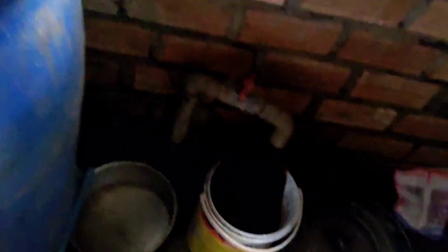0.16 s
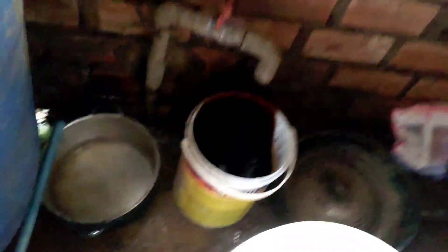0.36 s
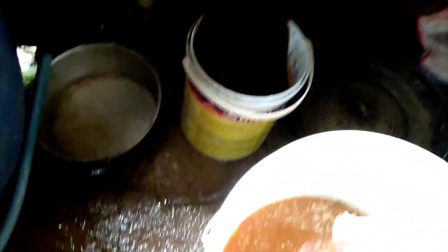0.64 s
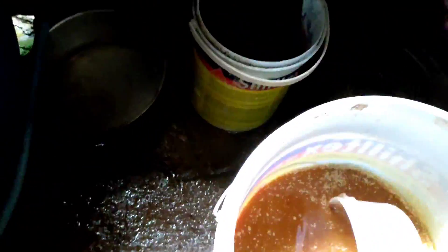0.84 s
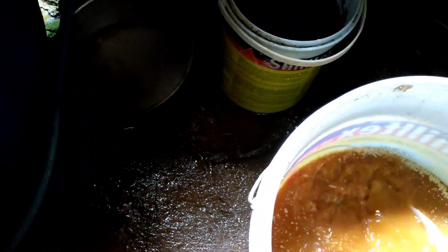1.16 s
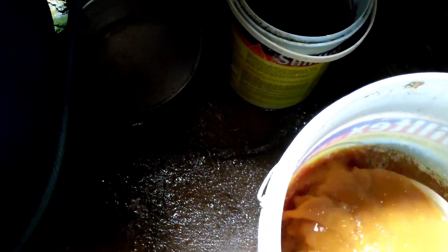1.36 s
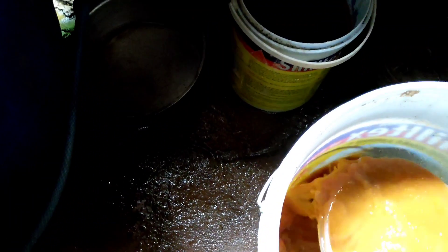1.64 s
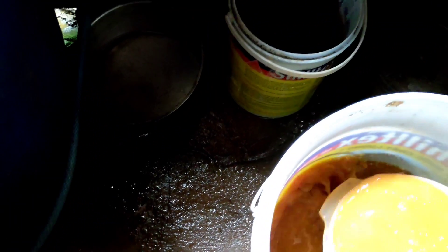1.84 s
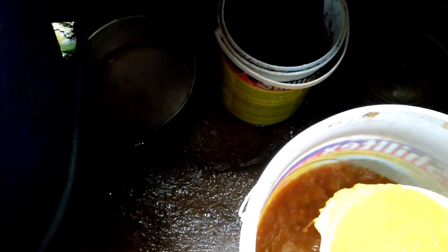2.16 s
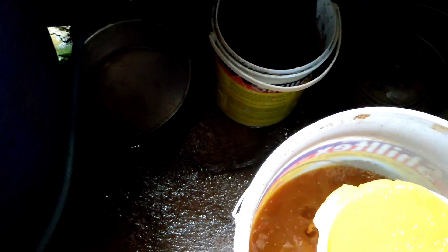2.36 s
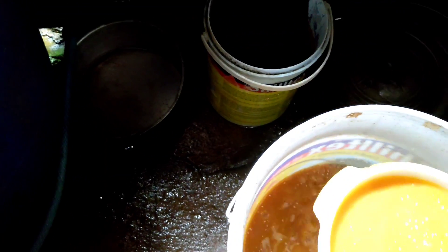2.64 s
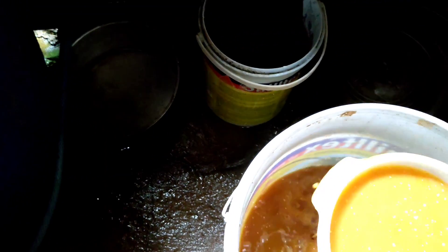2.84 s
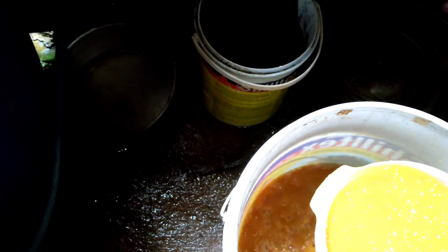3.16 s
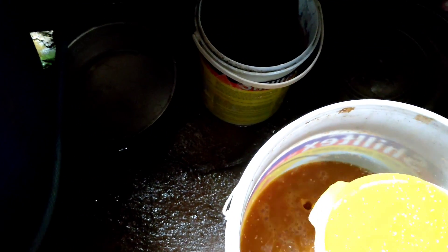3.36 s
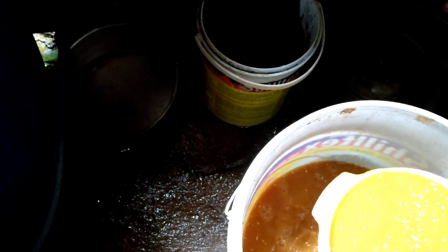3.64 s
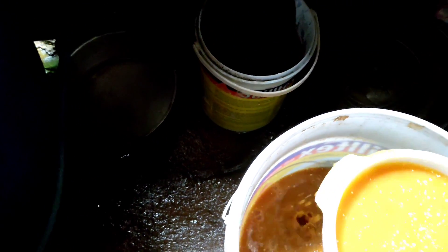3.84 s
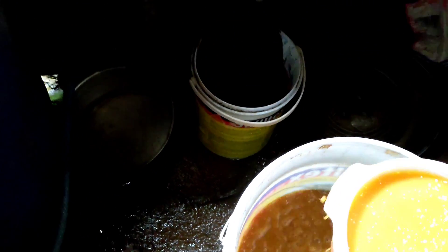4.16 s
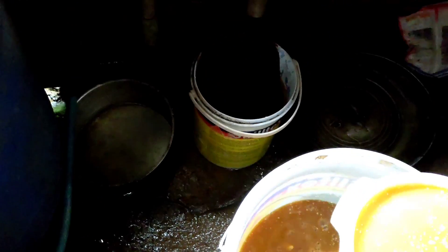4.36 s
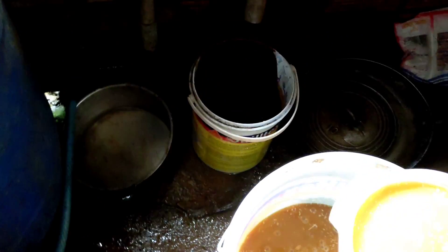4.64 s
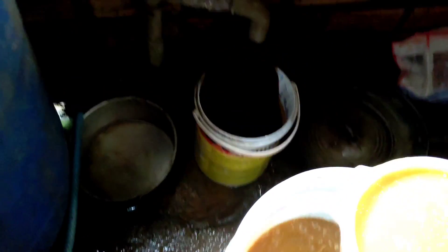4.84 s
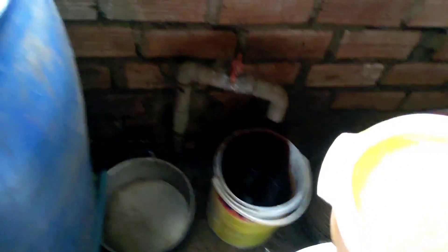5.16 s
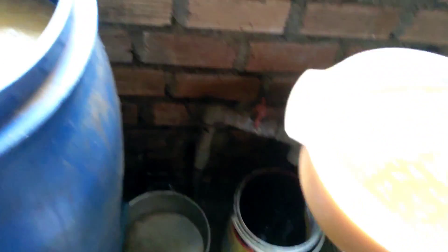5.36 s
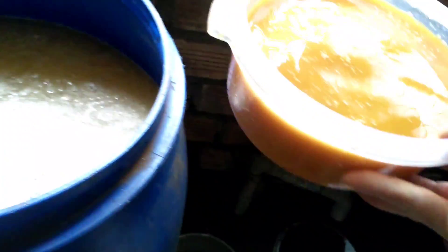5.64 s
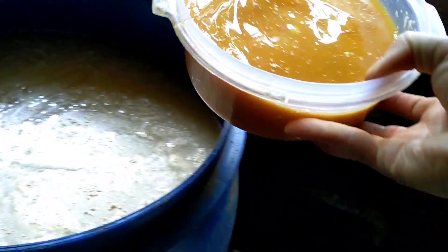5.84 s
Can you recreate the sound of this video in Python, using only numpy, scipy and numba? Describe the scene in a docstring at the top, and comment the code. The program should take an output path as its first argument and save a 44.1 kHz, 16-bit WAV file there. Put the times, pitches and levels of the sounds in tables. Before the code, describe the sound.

Close to a hand-held phone in a brick yard, a plastic scoop clacks on a bucket and gulps under. Bubbling grows into dense splashing and spatter, strongest around the middle, then drops off to a few plips. Another brief pour splashes back and thins out into isolated drops. Soft rustling and a muffled handling thump follow, over steady low rumble and short reflections.

```python
"""Thick liquid is scooped from a plastic bucket in a brick yard, close below a hand-held phone.
It runs off the scoop in streams: showers of gliding sines bubble, noise spatters and the bucket booms.
Splashes are noise slaps with clustered notes; larger bubbles ring, whistle and excite the bucket.
The scoop knocks on damped plastic modes and gulps low, sliding notes as it goes under.
Last drops plop into the quiet, over shaped-noise yard rumble, holder's rustle and a soft thump."""
import sys
import numpy as np
from scipy import signal
from scipy.fft import rfft, irfft
from scipy.io import wavfile
from scipy.ndimage import uniform_filter1d
from numba import njit

SR = 44100
rng = np.random.default_rng(int(sys.argv[2]) if len(sys.argv) > 2 else 0)


def put_to_file(sound):
    """Save the sound as 16-bit audio at rate SR, in the file named by the first command-line argument."""
    columns = np.atleast_2d(sound).T  # one column per channel
    safe = np.clip(columns, -1, 1)
    whole_steps = np.round(safe * 32767)
    wavfile.write(sys.argv[1], SR, whole_steps.astype(np.int16))


N = 264361  # samples, about 6 s

# air and wall resonances of the bucket: (frequency [Hz], width [Hz], relative level [dB])
BUCKET_MODES = [(296.2, 25, 9), (419.7, 39, 7.5), (552, 74, -1.5), (771, 60, 1.5)]
# gushes running off the scoop, and faint, low bubbling between the last drops:
# (start [s], end [s], bubbling level [dB], spray level [dB], bucket boom level [dB],
#  basic growth start to end [dB], central bubble pitch [Hz])
GUSH_TABLE = [(0.828, 0.911, -60, -83, -68.5, -2, 820), (0.964, 1.122, -51.5, -66.5, -85, -11, 879),
              (1.141, 1.32, -47.5, -62, -68, -13.5, 1111), (1.46, 1.552, -66.5, -66.5, -74.5, 5, 1366),
              (1.58, 1.756, -43, -47.5, -61, 5.5, 1000), (1.795, 1.948, -43, -38.5, -53.5, 5.5, 869),
              (2.012, 2.032, -47, -74, -52, -2, 1277), (2.103, 2.143, -56, -45, -74, -1, 928),
              (2.196, 2.212, -46.5, -74, -59, -2, 817), (2.262, 2.534, -45.5, -39.5, -52, 2, 1012),
              (2.624, 2.788, -47, -43.5, -47.5, 4, 994), (2.895, 3.147, -71.5, -58, -93, -6.5, 1062),
              (3.637, 3.727, -41, -40.5, -67, 1, 999), (3.734, 3.987, -44, -46, -50.5, -3, 1060),
              (4.622, 4.862, -76, -88, -73, -8, 698), (5.138, 5.297, -78.5, -80, -92, -16.5, 780),
              (5.853, 5.96, -68, -80.5, -77, -2, 1193)]


def undb(db):
    """Decibels to amplitude ratio."""
    return 10 ** (np.asarray(db) / 20)


def unit(x):
    """Scale to an overall RMS of one."""
    return x / np.sqrt(np.mean(x ** 2))


def curve(tables, count):
    """Columns of timed rows on the sample grid, -120 outside the tables, with smoothed corners."""
    t = np.arange(N) / SR
    out = np.full((count, N), -120.)
    for rows in tables:
        s, *cols = np.transpose(rows)
        on = (t >= s[0]) & (t < s[-1])
        out[:, on] = [np.interp(t[on], s, c) for c in cols]
    return uniform_filter1d(out, 257, axis=1)


def shaped(spectrum, channels=1):
    """Noise coloured by (frequency [Hz], relative level [dB]) points, joined over log frequency."""
    hz, db = np.transpose(spectrum)
    f = np.arange(N // 2 + 1) * SR / N + 1
    gain = undb(np.interp(np.log(f), np.log(hz), db))
    return irfft(rfft(rng.standard_normal((channels, N))) * gain, N)


def band(x, lo_hz, hi_hz):
    """Band-pass between two frequencies."""
    return signal.sosfilt(signal.butter(2, [lo_hz, hi_hz], "band", fs=SR, output="sos"), x)


def walk(rate):
    """Random levels held 1 / rate s and slewed twice; spread near 1."""
    k = int(SR / rate)
    steps = np.repeat(rng.standard_normal(N // k + 1), k)
    return 1.3 * uniform_filter1d(uniform_filter1d(steps, k), k)[:N]


@njit
def ring(n, sr, s, hz, t60, rise, size, pan, lag, swell):
    """Dying sines that glide in pitch; each reaches the two ports with its own balance and lag."""
    out = np.zeros((2, n))
    for k in range(len(s)):
        m = int(t60[k] * sr) + 2
        i0 = int(s[k] * sr)
        decay, glide = 1000. ** (-1. / m), 2. ** (rise[k] / m)
        w, ph = 2 * np.pi * hz[k] / sr, 0.
        a, on = size[k], 0.
        for i in range(i0, min(i0 + m, n)):
            on += (1 - on) * min(w / (2 * np.pi * swell), 1.)  # soft start
            out[0, i] += on * a * pan[k] * np.sin(ph - w * lag[k])
            out[1, i] += on * a / pan[k] * np.sin(ph + w * lag[k])
            ph, w, a = ph + w, min(w * glide, 2.8), a * decay
    return out


def grains(s, hz, t60, rise, db, pan_db, lag, swell):
    """Rings from columns that may be scalars; lag at each port in samples, swell in cycles."""
    pan = undb(np.asarray(pan_db) / 2)
    cols = np.broadcast_arrays(s, hz, np.clip(t60, .002, .4), rise, undb(db), pan, lag)
    return ring(N, float(SR), *(np.ascontiguousarray(c, float) for c in cols), float(swell))


def cracks(s, db, t60, lo_hz, hi_hz):
    """Short noise bursts, each in its own band, partly unlike at the two ports."""
    out, u = np.zeros((2, N)), np.arange(3000) / SR
    for t, g, d, lo, hi in np.broadcast(s, undb(db), t60, lo_hz, np.minimum(hi_hz, 16000)):
        i = int(t * SR)
        noise = rng.standard_normal((3, len(u)))
        envelope = g * np.exp(-np.log(1000) * u / d) * np.minimum(u / 0.0012, 1)
        burst = (noise[0] + 0.91 * noise[1:]) * envelope
        out[:, i:i + len(u)] += band(burst, lo, hi)[:, :N - i]
    return out


def yard():
    """Rumble alike at both ports, treble unrelated; rustle and a thump come from the holder."""
    # colour of the yard's air: (frequency [Hz], relative level per Hz [dB])
    air_colour = [(15, -74), (25, -10), (64, 8), (102, -5.5), (190, -9), (384, -13.5), (607, -12),
                  (677, -11), (1400, -15), (1580, -22), (1940, -21), (5570, -25), (10100, -33),
                  (16000, -47)]
    # fine hiss that swells as the holder turns: (time [s], relative level [dB], centre [Hz])
    rustle_rows = [
        [(0.0, -60, 5260), (0.5, -55, 3510), (0.78, -56, 3220), (1.2, -66, 4500), (3.0, -71, 4480),
         (3.3, -57.5, 4400), (3.6, -59, 4290), (4.15, -57, 4700), (4.48, -60, 4204), (4.6, -53, 5205),
         (4.84, -58.5, 5400), (5.1, -64, 4510), (5.99, -76.5, 3970)],
    ]
    # a hand shifts on the phone: (time [s], level [dB])
    thump_rows = [(4.78, -69), (4.798, -64), (4.968, -47.5), (5.02, -84)]
    air_db = -62

    mid, side = shaped(air_colour, channels=2)
    side = signal.sosfilt(signal.butter(3, 400, "high", fs=SR, output="sos"), side)
    air = unit(mid + side * np.array([[1], [-1]])) * undb(air_db + 0.89 * walk(2.555))

    db, hz = curve(rustle_rows, count=2)
    grain = rng.standard_normal((2, N))
    # a band of noise slid up to the moving centre, over a broad sheen
    carrier = np.sin(2 * np.pi * np.cumsum(np.maximum(hz, 3000)) / SR)
    core = band(grain, 30, 1150) * carrier
    sheen = unit(band(grain, 3850, 10660))
    rustle = unit(unit(core) + 0.75 * sheen) * undb(db - 3 + 2.0 * walk(28))

    thump_gain = undb(curve([thump_rows], count=1)[0])
    thump = unit(band(rng.standard_normal(N), 38, 64.5)) * thump_gain
    return air + rustle + thump


def splashes():
    """A slap of noise, a main droplet note and a cluster of close neighbours that follow."""
    # (time [s], relative level [dB], pitch [Hz], relative level of the treble crack [dB])
    splash_rows = [(0.044, -43, 5500, -25), (0.393, -43.5, 3880, -16), (1.13, -33.5, 2630, -20),
                   (1.1495, -21.5, 4100, 9.5), (1.1648, -26.5, 5310, 18), (1.2207, -32.5, 4770, 21.5),
                   (1.234, -33, 2190, -20), (1.324, -30.5, 2250, 3), (1.4817, -25.5, 3610, -30),
                   (1.542, -24.5, 2960, -28), (1.56, -27.5, 2490, -23), (1.635, -24, 3320, 14.5),
                   (1.6668, -25.5, 4960, 12), (1.743, -22, 5070, -18), (1.7544, -22, 4930, 22),
                   (1.807, -14, 2830, -22), (1.822, -17, 2920, -2), (1.937, -19.5, 2360, 2),
                   (2, -40, 4440, 27), (2.035, -30, 6670, 22.5), (2.085, -29, 4110, 16),
                   (2.103, -20, 4400, 14), (2.127, -24, 4000, 11), (2.178, -21, 3740, -30),
                   (2.194, -30.5, 5570, -4), (2.24, -28, 5450, 7), (2.2612, -22, 4590, 13.5),
                   (2.279, -21, 2080, -20), (2.301, -19.5, 4830, 2), (2.316, -16, 4850, 8),
                   (2.33, -19, 3470, 5), (2.384, -23, 4530, 13), (2.428, -16, 3320, -10),
                   (2.4599, -6, 4480, -28), (2.4767, -14.5, 5060, 7), (2.503, -13, 3880, -7),
                   (2.519, -14.5, 2940, -30), (2.5438, -21, 4810, 12), (2.572, -21, 4900, 11.5),
                   (2.621, -20, 4120, -10), (2.628, -12, 4410, -30), (2.702, -17.5, 3180, -27),
                   (2.721, -19.5, 5080, -8), (2.765, -13, 4430, -24), (2.776, -18, 3040, -18),
                   (2.807, -16.5, 4350, -25), (2.864, -29, 2760, -10), (2.891, -35.5, 4830, 17.5),
                   (2.928, -35, 2840, 16.5), (2.965, -46, 6750, 27.5), (2.976, -32.5, 2470, -10),
                   (3.01, -30, 4760, 14.5), (3.035, -38, 2320, -8), (3.045, -30.5, 2675, 13),
                   (3.092, -43, 3760, -20), (3.1693, -33, 2750, -24), (3.41, -39, 2940, 9),
                   (3.475, -41.5, 4110, 16.5), (3.5294, -33.5, 4320, -25), (3.577, -22.5, 4810, 10),
                   (3.605, -30.5, 2760, -30), (3.614, -15.5, 3890, -14), (3.6274, -14, 2710, 5),
                   (3.6547, -20, 2590, 17.5), (3.694, -25, 4860, -4), (3.71, -10, 4885, -19),
                   (3.734, -24.5, 5560, 16), (3.765, -25.5, 4720, 3), (3.786, -21, 3840, -10),
                   (3.816, -20, 4550, -12), (3.838, -19.5, 4100, -18), (3.866, -17, 4630, -21),
                   (3.889, -18, 3980, -16), (3.908, -15, 3394, -30), (3.911, -19, 4240, -16),
                   (3.939, -18.5, 5530, 1), (3.9686, -14.5, 3260, -30), (4.0002, -24, 3190, -14),
                   (4.0297, -16, 2850, 1), (4.058, -31, 4280, -15), (4.1005, -32, 5380, -30),
                   (4.101, -36, 2830, -22), (4.198, -49, 9530, 11), (4.224, -38.5, 2760, 5),
                   (4.323, -44, 7050, -3), (4.419, -44, 5150, 11), (4.4485, -46, 3530, 20.5),
                   (4.472, -32, 4510, -28), (4.5, -44, 3440, -23), (5.458, -64, 6480, 25)]
    # violent splashes are torn up sooner: t60 at -23.5 dB, and the extra dB that halve it
    t60_s, halving_db = 0.037, 60.5

    s, db, hz, crack_db = np.transpose(splash_rows)
    t60 = t60_s * .5 ** ((db + 23.5) / halving_db)
    c = rng.standard_normal((len(s), 13)).T
    # short waves reach the two ports unevenly, differently for every drop
    out = grains(s, hz, t60, 0.13, db - 7.0, 1.8 * c[12], -0.72, 3.8)
    out += grains(s, 0.901 * hz, 0.004, 0, db - 2.5, 0, -1.3, 1.7)  # the first contact ticks
    for k in range(4):
        later = s + 0.0054 * abs(c[k])
        near_hz = hz * 2 ** (0.1534 * c[4 + k])
        out += grains(later, near_hz, 0.57 * t60, 0.16, db - 8.0, 9.3 * c[8 + k], -2.52, 5.4)
    slap = cracks(s, db - 5.0, 1.015 * t60, .72 * hz, 1.247 * hz)
    return out + slap + cracks(s, db + crack_db - 19.0, .5 * t60, 3600, 10640)


def knocks():
    """Scoop against bucket: plastic modes, tilted by how sharp the blow is, plus a click."""
    # blows: (time [s], relative level [dB], brightness [0-1])
    blows = [(0.601, -30, 0), (0.683, -34.5, 1), (.706, -25, 1), (0.71, -9, 1), (0.728, -27.5, 0)]
    # damped plastic modes: (frequency [Hz], relative level [dB], t60 [s])
    plastic_modes = [(645, -10, 0.068), (810, 15.5, 0.014), (1330, 14, 0.016), (1563, -0.5, 0.047),
                     (2770, -14, 0.025), (2860, 14.5, 0.018), (3130, 27, 0.0046), (4320, 0, 0.021),
                     (5450, -26, 0.017)]

    hz, mode_db, t60 = np.transpose(plastic_modes)
    out = 0
    for s, db, bright in blows:
        tilt_db = 14 * (bright - .7) * np.log2(hz / 1500)
        out = out + grains(s + 0 * hz, hz, t60, 0, db - 18.5 + mode_db + tilt_db, 0, 0.98, 4.36)
    s, db, bright = np.transpose(blows)
    return out + cracks(s, db - 37.0 + 25 * bright, 0.025, 1400, 10600)


def gushes(db, fade_db_per_s, build_db=0):
    """Gain of each gush: a quick onset, steady level change while it runs, then a fade."""
    onset_db_per_s = 703
    t = np.arange(N) / SR
    start, end, growth_db = np.array(GUSH_TABLE)[:, [0, 1, 5], None].transpose(1, 0, 2)
    done = np.clip((t - start) / (end - start), 0, 1) - .5
    onset_db = onset_db_per_s * np.maximum(start - t, 0)
    fade_db = fade_db_per_s * np.maximum(t - end, 0)
    return undb(db[:, None] + (growth_db + build_db) * done - onset_db - fade_db)


def shower(count, hz, spread, cycles, scatter_db, lag, patch_db):
    """Random bubbles of unit total level: few loud, many faint, bunched in time; hz is a curve."""
    c, e = rng.standard_normal((count, 4)).T, rng.random((count, 2)).T
    i = (e[0] * (N - 1)).astype(int)
    f = np.clip(hz[i] * 2 ** (spread * c[0]), 560, 15000)
    db = scatter_db * np.minimum(-np.log(e[1]), 2.4) + patch_db * walk(50)[i]
    t60 = cycles / f * 2 ** (0.73 * c[2])
    return unit(grains(i / SR, f, t60, 0.35, db, 3.5 * c[1], lag + 2.33 * c[3], 3.5))


def stream():
    """Bubbles gurgle, small ones fizz, droplets spatter, and the falling liquid booms in the bucket."""
    # colour of the spatter: (frequency [Hz], relative level per Hz [dB])
    spray_colour = [(880, -66), (1500, -29.5), (1880, -27.5), (2140, -5.5), (3520, -6), (4550, 0),
                    (7320, -4.5), (10100, -4), (13400, -13), (16000, -18)]
    gurgle_fade, spray_fade, boom_fade = 273.5, 163, 341  # dB per s
    size_wander_oct = 0.157  # bubble size drifts within a gush
    reference_droplet_hz = 4287  # fizz pitch where the gush bubbles at 1 kHz
    boom_build_db = 1.5  # boom gains slightly on the bubbling over a gush

    _, _, low_db, spray_db, boom_db, _, pitch = np.transpose(GUSH_TABLE)
    low = gushes(low_db, gurgle_fade)
    gush_hz = pitch[low.argmax(0)]  # the strongest gush sets the pitch
    hz = gush_hz * 2 ** (size_wander_oct * walk(7))
    droplet_hz = reference_droplet_hz * (gush_hz / 1000) ** 0.8  # coarse gushes, coarser droplets
    low, high = low.sum(0), gushes(spray_db, spray_fade).sum(0)

    gurgle = shower(count=6000, hz=hz, spread=0.2396, cycles=17.6, scatter_db=4.0, lag=0.3, patch_db=4.5)
    patter = shower(count=4000, hz=2.4 * hz, spread=0.352, cycles=36,
                    scatter_db=1.5, lag=1.83, patch_db=5.0)
    fizz = shower(count=8000, hz=droplet_hz, spread=0.366, cycles=41,
                  scatter_db=2.5, lag=-2.2, patch_db=5.0)

    # each droplet opens the spray noise at once and lets it die in a few ms
    drops = (rng.random(N) < 130 / SR) * undb(-3.5 * np.log(rng.random(N)))
    gate = signal.lfilter([1], [1, -np.exp(-1 / (0.007 * SR))], drops)
    mid, side = shaped(spray_colour, channels=2) * (gate + 0.35)
    spatter = unit(mid + 0.86 * side * np.array([[1], [-1]]))

    beat = rng.standard_normal(N) * undb(4.0 * walk(60))  # uneven drive on the bucket
    boom = unit(sum(undb(db) * band(beat, f - w / 2, f + w / 2) for f, w, db in BUCKET_MODES))
    boom_gain = gushes(boom_db, boom_fade, boom_build_db).sum(0)
    spray = (fizz * undb(3.5) + spatter * undb(-2.0)) * high
    return gurgle * low + patter * np.sqrt(low * high) * undb(2) + spray + boom * boom_gain


def whistles():
    """Bubbles that linger or are squeezed: thin tones swell and fade, flutter and waver in pitch."""
    # (start [s], length [s], start pitch [Hz], end pitch [Hz], relative level [dB])
    whistle_rows = [(0.975, 0.086, 450, 476, -43.5), (1.064, 0.069, 640, 610, -46.5),
                    (1.242, 0.049, 482, 1280, -42), (1.254, 0.025, 1153, 1550, -44.5),
                    (1.322, 0.02, 1144, 1540, -42.5), (1.335, 0.075, 1364, 1383, -54.5),
                    (1.49, 0.083, 1196, 1260, -60), (1.708, 0.0207, 1700, 2870, -34),
                    (1.914, 0.012, 3910, 3940, -27.5), (2.86, 0.049, 898, 2110, -44),
                    (3.183, 0.018, 1610, 2300, -58), (3.345, 0.035, 2570, 3060, -53.5),
                    (3.415, 0.046, 2120, 2136, -49.5), (4.33, 0.072, 1670, 1600, -70),
                    (4.405, 0.16, 1196, 1185, -62), (4.476, 0.042, 1073, 1120, -57),
                    (5.071, 0.045, 1092, 1344, -55), (5.421, 0.061, 1700, 1727, -55.5),
                    (5.423, 0.031, 1900, 3380, -60), (5.487, 0.12, 1252, 1350, -58.5)]
    t, out = np.arange(N) / SR, 0
    flutter, waver = undb(2.5 * walk(160)), 1 + .015 * walk(130)
    for s, length, hz, end_hz, db in whistle_rows:
        u = np.clip((t - s) / length, 0, 1)
        pitch = (hz + (end_hz - hz) * u ** 1.244) * waver
        envelope = np.sin(np.pi * u ** 0.58) ** .5 * (u < 1)
        out = out + undb(db) * envelope * np.sin(2 * np.pi * np.cumsum(pitch) / SR)
    return out * flutter


def bubbles():
    """Each large bubble slaps open, rings at its size with fluttering level and thumps the bucket."""
    # (time [s], relative level [dB], starting pitch [Hz], pitch glide [octaves])
    bubble_rows = [(.98, -41, 905, 0.13), (.997, -35, 877, 0.086), (1.072, -31.5, 973, 0.18),
                   (1.11, -33.5, 866, 0.11), (1.149, -25.5, 950, 0.19), (1.214, -32, 1310, -0.34),
                   (1.304, -28.5, 1124, 0.35), (1.34, -39.5, 2065, -0.027), (1.486, -39, 1466, 0.27),
                   (1.494, -36, 1874, -0.031), (1.576, -35.5, 886, 0.057), (1.592, -23.5, 585, 0.58),
                   (1.6, -39, 1104, 0.7), (1.64, -25, 2040, 0.14), (1.637, -27.5, 990, 0.71),
                   (1.659, -27.5, 1420, -0.075), (1.72, -21.5, 933, 0.25), (1.746, -19.5, 1340, 0.22),
                   (1.764, -27, 1413, 0.24), (1.854, -23, 980, 0.21), (1.877, -18.5, 806, -0.19),
                   (1.89, -18.5, 1080, 0.08), (1.938, -13.5, 790, -0.4), (2.019, -26, 1270, -0.074),
                   (2.109, -35, 1360, -0.15), (2.138, -32.5, 775, -0.17), (2.198, -22.5, 834, -0.6),
                   (2.263, -36, 695, 0.32), (2.321, -41, 940, -0.1), (2.336, -24, 725, 0.16),
                   (2.42, -34.5, 766, 0.071), (2.446, -29, 1200, -0.18), (2.574, -19, 1094, -0.56),
                   (2.595, -29.5, 1038, 0.73), (2.609, -16, 2220, -0.14), (2.667, -28, 920, 0.4),
                   (2.698, -20.5, 2060, 0.15), (2.68, -31, 628, 0.66), (2.787, -25, 1140, 0.11),
                   (2.79, -33, 766, 0.056), (2.872, -35, 1066, 0.51), (2.978, -38, 1830, 0.66),
                   (3.051, -42, 1774, -0.058), (3.174, -45.5, 1590, 0.55), (3.411, -36.5, 2128, -0.053),
                   (3.488, -44, 1810, -0.094), (3.627, -27.5, 1135, 0.16), (3.711, -21, 1093, 0.087),
                   (3.725, -16.5, 907, 0.22), (3.799, -25, 1110, -0.039), (3.87, -28, 1080, 0.0082),
                   (3.885, -28.5, 1090, .1), (3.906, -34, 1075, 0.32), (3.926, -31.5, 1036, 0.43),
                   (3.973, -32, 1003, 0.29), (4.056, -52, 1023, -0.25), (4.101, -36.5, 1713, 0.69),
                   (5.062, -38, 1082, 0.33), (5.407, -37.5, 1636, 0.11)]
    # violent bubbles are torn up sooner: t60 at -28.5 dB and 1 kHz, and the extra dB that halve it
    t60_s, halving_db = 0.05, 18
    size_law = 0.22  # larger, lower bubbles ring longer: power of 1 kHz over pitch

    s, db, hz, rise = np.transpose(bubble_rows)
    t60 = t60_s * .5 ** ((db + 28.5) / halving_db) * (1000 / hz) ** size_law
    out = grains(s, hz, t60, rise, db, 0, 0.66, 1.43) * undb(1.6 * walk(150))
    out = out + cracks(s, db - 11.0, 1.5 * t60, 0.75 * hz, 2.0 * hz).mean(0)
    for mode_hz, width, mode_db in BUCKET_MODES:
        out += grains(s, mode_hz, 2.1 / width, 0, db - 25.0 + mode_db, 0, 0, 7.7)
    return out


def gulp():
    """Each trapped pocket of air swells into a low note that slides as the pocket changes shape."""
    # air pockets closing in the sinking scoop:
    # (time [s], relative level [dB], starting pitch [Hz], ring t60 [s], slide [octaves])
    pockets = [(1.143, -19, 494, 0.054, -0.52), (1.151, -17.5, 384.4, 0.132, -0.63),
               (1.21, -22.5, 436, 0.091, 0.46)]
    s, db, hz, t60, rise = np.transpose(pockets)
    return grains(s, hz, t60, rise, db, -0.79, 2.1, 3.1)


def scene():
    """The scoop's sounds close to the phone, their short reflections, and the yard."""
    # left-right balance of the near sounds over time: (time [s], left over right [dB])
    balance_rows = [(.6, -2), (3, 0), (3.7, 0), (4.3, 4), (5.6, 3)]
    wet_db, wet_t60_s = -6.5, 0.14

    near = stream() + bubbles() + splashes() + gulp() + knocks() + whistles()
    # bucket walls and brick return a short, dense tail; only its treble differs between the ports
    decay = np.exp(-np.log(1000) * np.arange(8000) / SR / wet_t60_s)
    mid, side = rng.standard_normal((2, 8000)) * decay
    tail = band(mid, 406, 12200) + 1.24 * band(side, 1470, 17000) * np.array([[1], [-1]])
    tail = tail / np.sqrt(np.sum(mid ** 2))
    wet = signal.fftconvolve(near.mean(0)[None], tail, axes=1)[:, :N]
    balance_db = np.interp(np.arange(N) / SR, *np.transpose(balance_rows))
    direct = near * undb(np.array([balance_db, -balance_db]) / 2)
    return direct + undb(wet_db) * wet + yard()


def record(dry):
    """The phone cuts the top steeply."""
    top_hz = 15900
    return signal.sosfilt(signal.ellip(10, .2, 80, top_hz, fs=SR, output="sos"), dry)


dry = scene()
out = record(dry)
put_to_file(out)
```